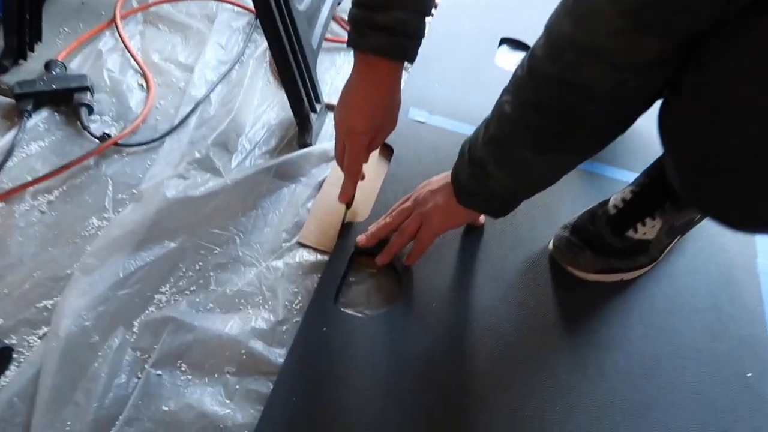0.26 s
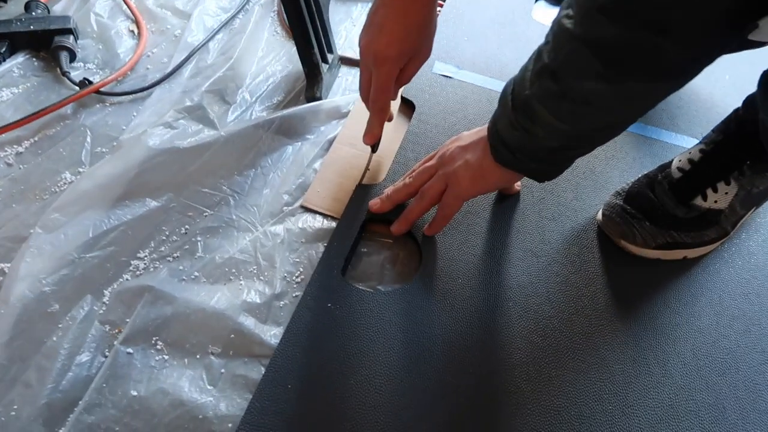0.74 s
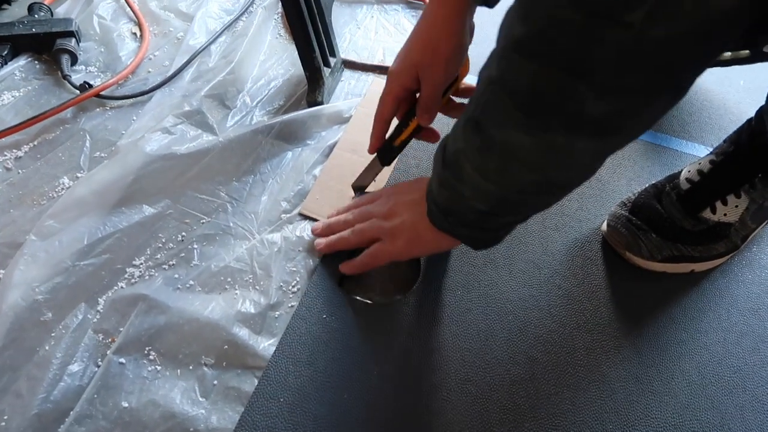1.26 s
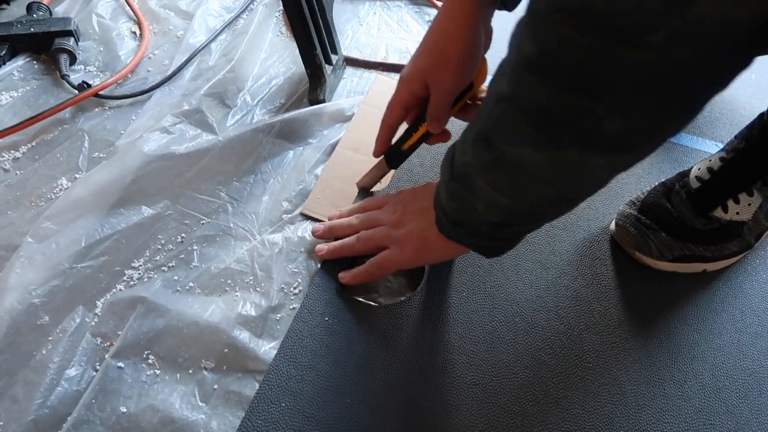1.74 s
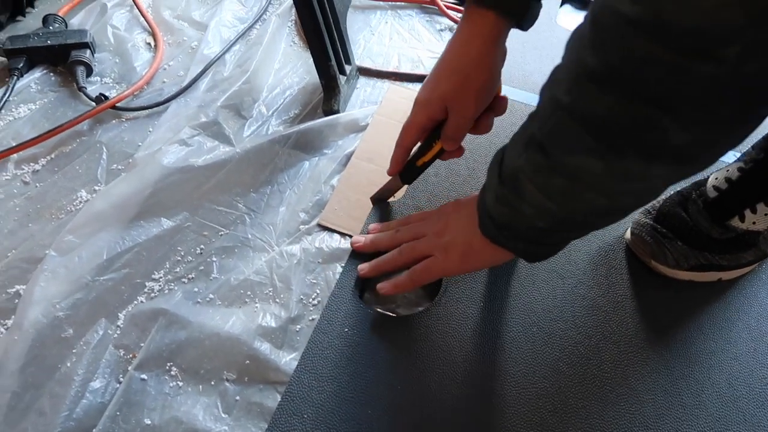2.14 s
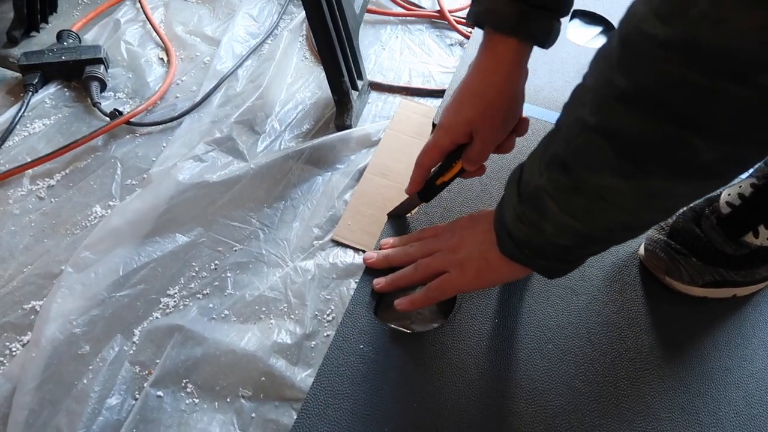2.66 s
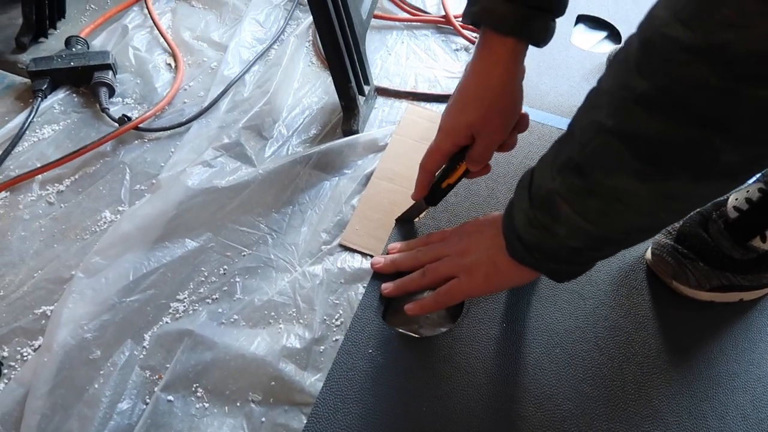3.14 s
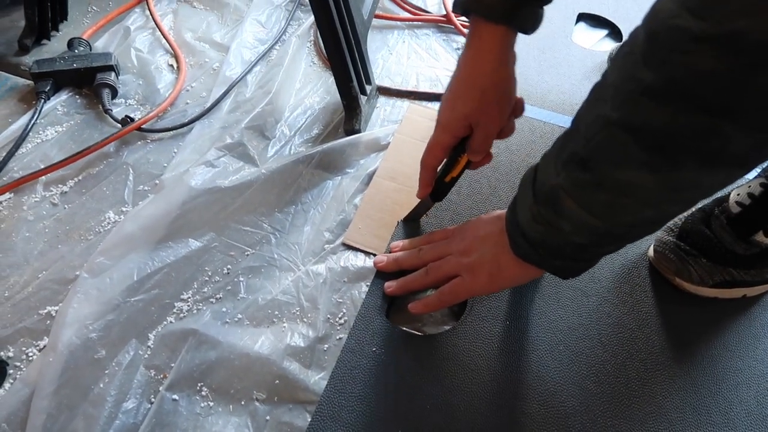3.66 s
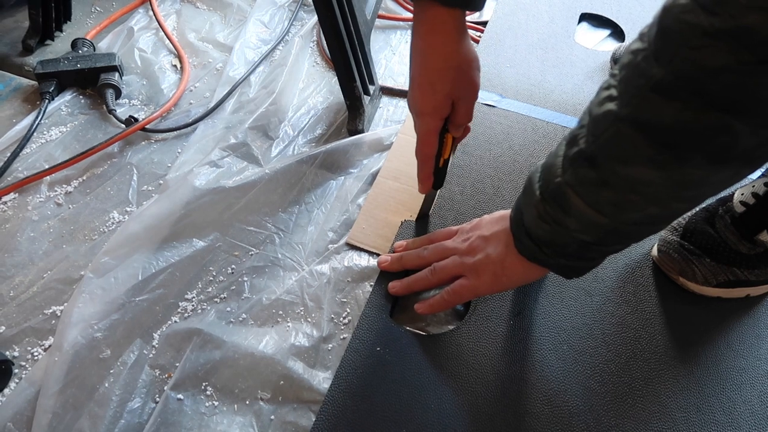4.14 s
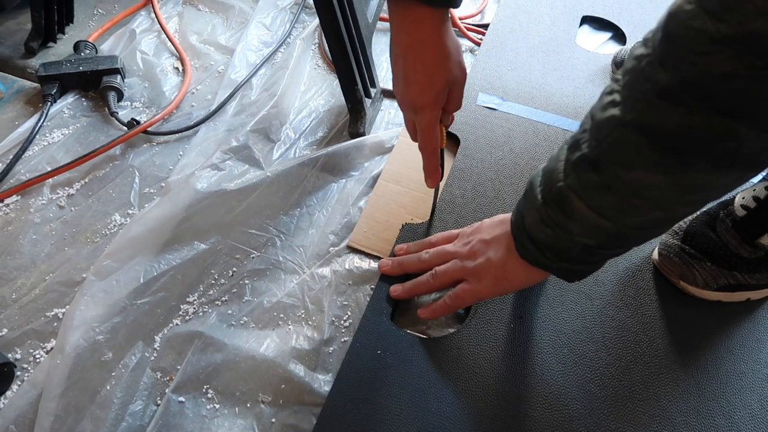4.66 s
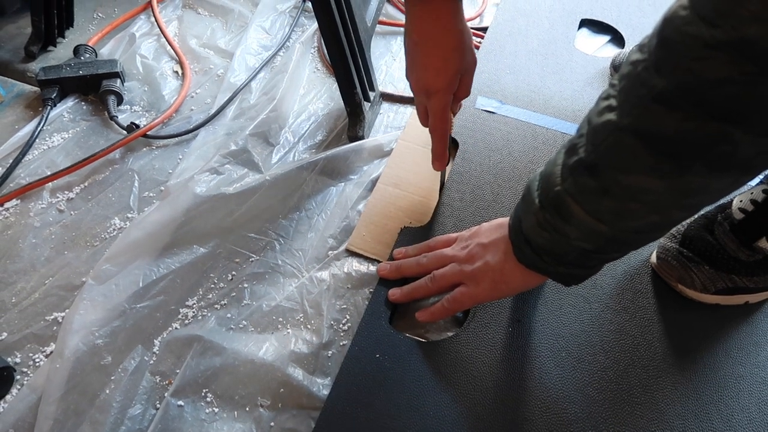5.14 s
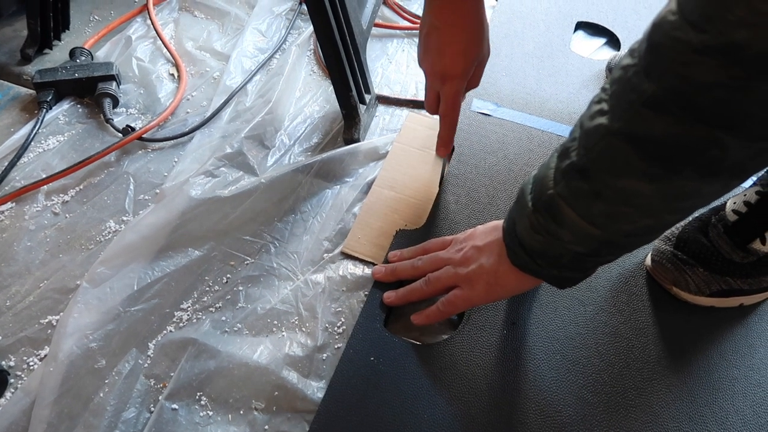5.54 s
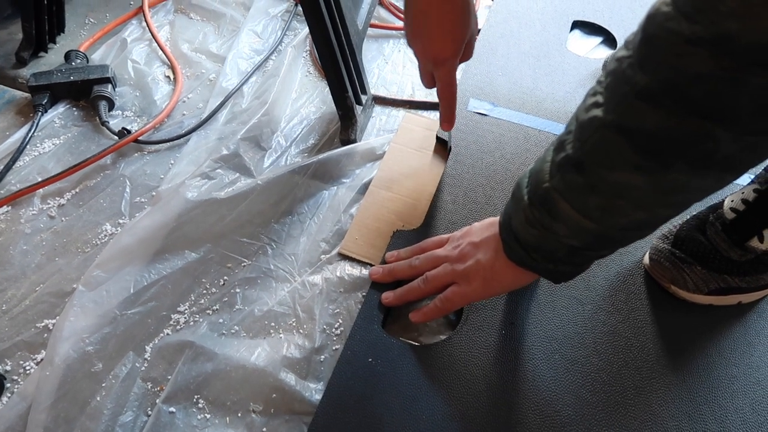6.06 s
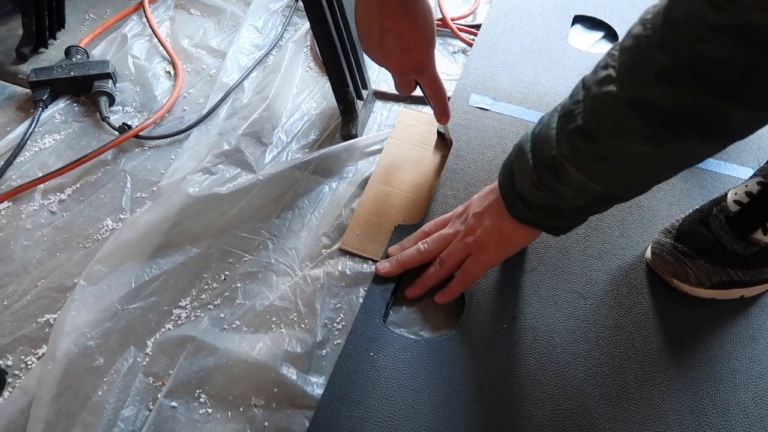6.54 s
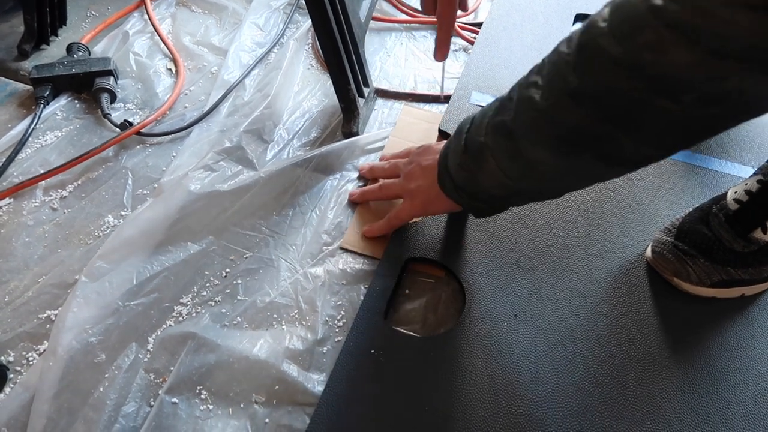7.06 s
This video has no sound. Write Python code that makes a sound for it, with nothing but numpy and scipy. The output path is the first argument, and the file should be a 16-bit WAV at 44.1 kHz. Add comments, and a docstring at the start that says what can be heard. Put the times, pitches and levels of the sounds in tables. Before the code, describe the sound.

Inside a bare metal van, heard close, with a faint steady low rumble from outside. A soft shoe scuff opens, then from 0.2 to 0.9 seconds short dry knife scratches and tiny ticks, with a sleeve swishing at about 0.7. A dull knock comes at 1.2, then light scrapes and a sharp tick at 1.4, sparse clicks around 1.7 and 2.0, and another knock at 2.1. It stays quiet with faint scratching and cloth swish until 3.6. A very loud bright snap strikes at 4.0 and rings briefly; more cracks with floor thuds come at 4.5 and 4.7, followed by scratches. A violent short rip bursts at 5.2, then an even, coarse rasping cut runs from 5.6 to 5.9. A soft slide over the floor follows around 6.0 to 6.3, small clicks at 6.4 to 6.6, a crisp tick and sleeve swish near 6.85, and last light ticks at 7.0.

```python
"""A utility knife trims a piece of cardboard on the floor of an empty van.
The blade scratches in short strokes, snaps through the flutes and makes one long rasping cut: noise made of
many tiny breaks, and bursts that ring the cardboard and the steel. Blows set the floor panel shuddering.
A jacket sleeve rustles and swishes as bands of noise, and the metal cargo space rings briefly
over a low outdoor rumble."""
import sys
import numpy as np
from scipy import signal
from scipy.fft import rfft, irfft, next_fast_len
from scipy.io import wavfile

SR = 44100
rng = np.random.default_rng(int(sys.argv[2]) if len(sys.argv) > 2 else 0)


def store_wav(level_fs):
    """Save 16-bit WAV to argv[1]."""
    pcm = np.round(np.clip(np.atleast_2d(level_fs), -1, 1) * 32767)
    wavfile.write(sys.argv[1], SR, pcm.T.astype(np.int16))


N = 321753

# short strokes through the cardboard:
# (start [s], end [s], level before the trim [dB], tilt above 300 Hz [dB per octave])
STROKES = [(0.23, 0.312, -42.5, 3.5), (0.444, 0.526, -39, 2.5), (0.477, 0.498, -42.5, 2),
           (.55, 0.672, -47, 1), (0.772, 0.799, -37, 2), (0.813, 0.852, -37.5, 2.5),
           (1.261, 1.385, -49, 6.5), (1.415, 1.445, -41.5, -1), (1.431, 1.436, -34, 1.5),
           (1.48, 1.498, -41, -0.5), (1.739, 1.809, -45, -1.5), (2.004, 2.037, -42.5, -3),
           (2.681, 2.777, -48.5, 3), (2.95, 2.955, -53.5, 4), (3.068, 3.107, -45, 1),
           (3.434, 3.474, -47, 3), (3.597, 3.667, -42.5, 0), (3.758, 3.811, -45.5, .5),
           (4.046, 4.103, -49, 3), (4.119, 4.128, -39.5, 2.5), (4.68, 4.708, -32.5, 1),
           (4.71, 4.784, -40.5, 2.5), (4.839, 4.899, -43, 1.03), (4.905, 4.969, -40, 1.83),
           (5.135, 5.143, -38.5, 2.5), (5.999, 6.044, -48, -2.5), (6.159, 6.169, -46.5, 2),
           (6.415, 6.457, -39.5, -1.45), (6.434, 6.448, -38, 0), (6.846, 6.852, -35, 1.5),
           (6.851, 6.857, -37, 6), (6.861, 6.899, -48, -0.5), (7.04, 7.069, -41, 2)]
# resonances under the scraping, also used by tears(): (frequency [Hz], width [Hz], lift or dip [dB])
RASP_PEAKS = [(255.2, 110, 0.5), (699, 150, 6.5), (1301, 180, 7), (1865, 310, 5), (2361, 330, 5.5),
              (3540, 730, 3.5), (7400, 530, -0.5)]


def strokes(edge_s=0.0019, lift_s=0.0069, trim_db=-0.62, graze_s=0.04, graze_db=-9):
    """In a short stroke the tip grazes the surface, bites into it, and grazes again as it lifts."""
    out = np.zeros((2, N))
    for start, end, db, tilt in STROKES:
        t = np.arange(start - graze_s, end + graze_s, 1 / SR)
        bite = np.interp(t, [start - edge_s, start + edge_s, end, end + lift_s], [0, 1, 1, 0])
        graze = np.interp(t, [t[0], start, end, t[-1]], [0, 1, 1, 0]) * amp(graze_db)
        scrape = rasp(t, tilt, RASP_PEAKS, slip_db=0.87, grit_db=5.0)
        add(out, t[0], amp(db + trim_db) * np.maximum(bite, graze) * scrape)
    return out


# force on the blade as it strains and bursts through: (time [s], level before the trim [dB])
RIP_FORCE = [(5.135, -43.5), (5.183, -34), (5.19, -22), (5.2, -20.5), (5.222, -22.5), (5.23, -32),
             (5.245, -36.5)]
# resonances of the sheet in the rip: (frequency [Hz], width [Hz], lift or dip [dB])
RIP_PEAKS = [(258, 116, 3.5), (450, 144, -4), (709, 77, 11), (1195, 74, 5), (1475, 128, 10),
             (1696, 75, 8.5), (1970, 86, 7), (2458, 102, 10), (3150, 68, 1), (3360, 118, 4.5),
             (4650, 135, 6.5), (5160, 83, 9), (6270, 70, 8), (7460, 164, 5.5)]


def rip():
    """The blade strains, then bursts through several flutes at once."""
    return pull(RIP_FORCE, RIP_PEAKS, trim_db=-0.01, tilt_db=1.46, slip_db=-0.14, grit_db=3.5)


# force on the blade through the one long, deep cut: (time [s], level before the trim [dB])
CUT_FORCE = [(5.43, -60), (5.55, -45), (5.641, -38.5), (5.648, -31), (5.69, -31.5), (5.735, -33),
             (5.775, -30.5), (5.83, -31), (5.88, -30), (5.896, -38), (5.92, -55)]
# resonances of the sheet in the deep cut: (frequency [Hz], width [Hz], lift or dip [dB])
CUT_PEAKS = [(255, 98, 1.5), (682, 143, 7.5), (1338, 102, 11.5), (1873, 195, 13), (2360, 364, 7),
             (2815, 176, 3), (3484, 160, 6.5), (4290, 250, 3.5), (4880, 250, 5), (5850, 230, -1),
             (7260, 630, 5)]


def long_cut():
    """The deep cut: a dense, even rasp through the narrow resonances of the pinned sheet."""
    return pull(CUT_FORCE, CUT_PEAKS, trim_db=-0.8, tilt_db=0.1, slip_db=1.6, grit_db=2.5)


def pull(curve, peaks, trim_db, tilt_db, slip_db, grit_db):
    """One sustained scrape, as loud as the force behind it."""
    out = np.zeros((2, N))
    times, force_db = np.transpose(curve)
    t = np.arange(times[0], times[-1], 1 / SR)
    level = amp(np.interp(t, times, force_db) + trim_db)
    add(out, t[0], level * rasp(t, tilt_db, peaks, slip_db, grit_db))
    return out


# basic spectrum of all scraping, a shape only: (frequency [Hz], relative level [dB])
RASP_SPECTRUM = [(60, -19.5), (180, 4.5), (450, -0.5), (1000, -3.5), (1800, -4.5), (3000, -3.5),
                 (5000, -9.5), (8500, -15), (13000, -18), (14500, -31.5), (16000, -45)]


def rasp(t, tilt_db, peaks, slip_db, grit_db, slips_per_s=300, places_per_s=25, echo=0.0843, echo_s=.0045):
    """The edge catches and slips as it is drawn along, so the fibres break in clumps."""
    size = len(t)
    force = fibres(size, per_s=4500, spread_db=grit_db, hiss=0.473)
    force = force * amp(slip_db * wander(size, slips_per_s))
    # each break echoes through the surface, differently at each place along the way
    fade = echo * np.exp(-((t - t[0]) / echo_s) ** 2)
    echoes = np.zeros((2, size))
    for share in wandering_shares(size, places_per_s):
        pattern = fade * rng.standard_normal((2, size))
        echoes += signal.fftconvolve(force * share, pattern, axes=1)[:, :size]
    return unit(colour(force + echoes, RASP_SPECTRUM, peaks, tilt_db))


# snaps and ticks of the blade, also used by tears():
# (time [s], cardboard level [dB], blade level before the trim [dB], blade ring [Hz], strength of that ring [dB],
#  pitch of the sheet [ratio], length of the break [s])
SNAPS = [(.443, -51.5, -42, 3000, 4.5, 0.91, 0.0042), (.578, -59, -47.5, 3900, 6, 1, .005),
         (.611, -39, -49.5, 3910, 2.5, 1.107, 0.0056), (0.653, -45.5, -54, 4400, 14, 1.13, .005),
         (.85, -43.5, -39.5, 4360, 9.5, 0.97, 0.0053), (1.159, -39.5, -66, 3500, -3, .95, 0.0049),
         (1.298, -41.5, -46.5, 9700, 1.5, 1.22, 0.0039), (1.4116, -43.5, -30, 4400, 17, 0.67, .0045),
         (1.436, -38.5, -43.5, 3400, -2, 1.04, .007), (1.493, -51, -44.5, 4090, 5, 1.08, .005),
         (1.656, -39.5, -47.5, 3800, 12.5, 0.926, 0.0053), (1.667, -39.5, -38.5, 6850, 2.5, 1.09, 0.00575),
         (1.863, -45, -44, 4025, -2, 0.984, 0.0071), (2.003, -46, -56.5, 4000, -5.5, 0.88, 0.0047),
         (2.026, -52.5, -48, 6500, 2.5, 1.05, 0.0049), (2.068, -45, -47, 4450, 3.5, 1, 0.0048),
         (2.123, -40, -54.5, 4200, -8.5, 1.03, 0.0068), (2.171, -54.5, -41, 5200, -4, 1.3, 0.0059),
         (2.833, -71, -47.5, 11590, 6.5, 1, .002), (3.598, -58.5, -45, 4600, -15.5, 1, .005),
         (3.65, -36.5, -38, 4550, -13.5, 1.11, 0.0082), (3.774, -45, -46.5, 3810, -4.5, 1.13, .005),
         (4.0324, -14.5, -12.5, 7390, 1.5, 0.964, .0038), (4.098, -37, -38, 4240, 1, 1.1, 0.0047),
         (4.459, -28.5, -41, 2000, -2, 0.954, 0.00466), (4.4744, -33.5, -34, 3540, -17.5, 0.89, 0.0072),
         (4.6635, -16.5, -21.5, 7630, -5.5, 1.005, 0.00526), (4.699, -35, -35, 3520, -8.5, 0.86, 0.0068),
         (4.94, -41, -40, 4800, -1, 0.795, 0.0063), (5.013, -43, -54, 4200, -4, 0.79, .005),
         (5.199, -24.5, -29, 3910, -3.5, 1.012, 0.0044), (5.21, -30, -34, 5110, 2.5, 1.11, 0.0046),
         (5.2195, -24.5, -33.5, 3370, 4, 1.002, 0.0053), (5.648, -32.5, -43, 3500, -7.5, 1.23, 0.0064),
         (5.686, -35.5, -41, 4900, -3, .96, .005), (5.77, -35, -42, 3500, -3, .96, .005),
         (5.794, -35, -43, 4250, -3, .96, .004), (5.822, -33, -38, 3500, -7.5, 1.15, .006),
         (5.867, -37, -33, 3650, 7.5, 1.04, 0.0046), (5.995, -44.5, -48, 3800, 3, 0.994, 0.0064),
         (6.277, -42, -49.5, 3850, -1, 1.004, 0.0052), (6.415, -43, -52, 3800, -4.5, 0.98, 0.0057),
         (6.443, -34.5, -48.5, 4000, -6.5, 1.05, 0.0037), (6.527, -38.5, -49.5, 3750, -4.5, 1.12, 0.0056),
         (6.623, -44, -49.5, 6470, -4, 0.933, 0.0051), (6.788, -54, -47, 3580, 0, 1.07, 0.0048),
         (6.847, -33.5, -47, 3200, -0.5, .95, 0.0033), (6.849, -45, -26.5, 8600, -2, 1.06, 0.00605),
         (7.033, -43.5, -51, 3600, 9.5, 1.18, .004), (7.049, -34.5, -45, 3470, 10.5, 0.946, 0.00456)]
# modes of the cardboard on its backing, at pitch ratio 1: (frequency [Hz], level [dB], t60 [s])
BOARD_MODES = [(690, -16.5, .02), (974, -10, 0.024), (1430, 1, 0.0147), (1760.3, -0.5, 0.017),
               (1970.5, 2.5, 0.0155), (2422, 2.5, 0.0093), (2862, -3.5, 0.0071), (3319, 4.5, 0.0121)]
# modes of the blade and its holder: (frequency [Hz], level [dB], t60 [s])
BLADE_MODES = [(4000, -5, 0.0036), (4793, -3, 0.00303), (5960, -5.5, 0.0038), (7240, -2, 0.0044),
               (10060, -1.5, 0.0033), (12800, -9, 0.0056)]


def snaps(crack=3.7, pop=4, blade_trim_db=3.0, ring_t60=0.00503):
    """A flute gives way: the sheet, stiffer or slacker by place, pops; the blade's free length sets its ring."""
    out = np.zeros((2, N))
    t = np.arange(SR // 12) / SR
    for s, board_db, blade_db, hz, ring_db, stretch, break_s in SNAPS:
        force = fracture(t, decay_s=break_s, crumble=0.242)
        dead_pop = ring([(1714, 0.00512, 0.00041)], t)
        board = ring(BOARD_MODES, t * stretch) + pop * dead_pop
        steel = ring(BLADE_MODES + [(hz, ring_db, ring_t60)], t)
        steel[:2] += crack * np.array([1, -1])  # the bright edge of the break
        for body, db in (board, board_db), (steel, blade_db + blade_trim_db):
            sound = unit(signal.fftconvolve(force, body[None])[:, :len(t)])
            # a quarter turn of phase in the side signal sets left and right slightly apart
            quarter_turn = signal.hilbert(sound[0]).imag
            side = 0.575 * quarter_turn + 0.505 * sound[1]
            add(out, s, blow(stereo([sound[0], side], side_db=-4), db))
    return tone_filter(out)


def fracture(t, decay_s, crumble):
    """One clean break, followed within milliseconds by tearing fibres and echoes off the floor."""
    force = crumble * rng.standard_normal((2, len(t))) * np.exp(-(t / decay_s) ** 1.49)
    force[:, 0] += 1
    return force


def tears(tilt_db=-0.5, rise_s=0.0017, tear_db=-44.5, snap_ref_db=-28, follow=0.51, fade_db_per_s=167.5):
    """Each snap frees the blade, which tears on through the fibres a little and comes to rest."""
    out = np.zeros((2, N))
    t = np.arange(SR // 6) / SR
    for s, board_db, *_ in SNAPS:
        # a louder snap gives a louder tear, by a share of its extra decibels
        db = tear_db + follow * (board_db - snap_ref_db) - fade_db_per_s * t
        scrape = rasp(t, tilt_db, RASP_PEAKS, slip_db=1.5, grit_db=7.0)
        add(out, s, amp(db) * (1 - np.exp(-t / rise_s)) * scrape)
    return out


# blows that reach the floor panel: (time [s], level [dB], pitch of the struck spot [Hz], its t60 [s])
KNOCKS = [(1.159, -25.5, 475.5, 0.029), (1.164, -30, 189.3, 0.059), (2.1155, -24.5, 434, 0.063),
          (2.124, -32, 303, 0.083), (3.651, -30.5, 646, 0.041), (4.036, -30.5, 254, 0.07),
          (4.033, -32, 499, 0.01987), (4.461, -28, 317, 0.0253), (4.474, -29.5, 337.7, 0.06),
          (4.667, -20.5, 270.2, 0.0466), (4.665, -24, 538.4, 0.026), (5.2, -28, 700.6, 0.054),
          (5.886, -31, 321, 0.0345), (6.426, -34.5, 214.6, 0.06), (6.528, -30.5, 345, 0.024),
          (6.877, -39, 379, 0.041)]
# modes of the floor panel, before each blow shifts them a little: (frequency [Hz], level [dB], t60 [s])
PANEL_MODES = [(215, -1.5, 0.1), (277.1, 4, 0.073), (389.3, -2.5, 0.053), (533.5, 5.5, 0.025),
               (636, 1.5, 0.0347)]


def knocks(octaves=0.768, rise_s=0.00078, panel_db=-10):
    """Each blow rings the struck spot and stirs the panel modes near that pitch."""
    out = np.zeros((2, N))
    t = np.arange(SR // 5) / SR
    for s, db, spot_hz, spot_t60 in KNOCKS:
        sound = ring([(spot_hz, 0, spot_t60)], t)
        for hz, level, t60 in PANEL_MODES:
            near_db = -4 * (np.log2(hz / spot_hz) / octaves) ** 2
            late = np.maximum(t - rng.uniform(0, 0.003056), 0)  # each mode takes a moment to answer
            shifted_hz = hz * rng.uniform(0.9106, 1.0727)
            sound = sound + ring([(shifted_hz, level + near_db + panel_db, t60)], late)
        add(out, s, blow(sound * (1 - np.exp(-t / rise_s)), db)[None])
    return tone_filter(out)


# tone of snaps and knocks, with little bass and a treble roll-off above 13 kHz: (frequency [Hz], gain [dB])
CLICK_TONE = [(40, -29.5), (110, -19), (190, 0), (13300, -1), (14500, -15), (16000, -22)]
# small tone adjustments for snaps and knocks: (frequency [Hz], width [Hz], lift or dip [dB])
TONE_BANDS = [(782, 159, 1), (150, 46, -1)]


def tone_filter(x):
    """Tone filter for snaps and knocks: little bass, and treble rolled off above 13 kHz."""
    return colour(x, CLICK_TONE, TONE_BANDS)


# shudders after the heavier blows: (time of the blow [s], level [dB], pitch [Hz])
SHUDDERS = [(1.16, -51, 380), (2.116, -48.5, 310.9), (4.034, -42, 295), (4.461, -42, 318.3),
            (4.665, -39, 325.6), (5.199, -45, 279.5)]


def shudders(peak_s=0.0692, width_hz=110.8):
    """The close low modes of the panel build up after a blow and die away, as a narrow band of noise."""
    out = np.zeros((2, N))
    t = np.arange(SR // 2) / SR
    swell = (t / peak_s * np.exp(1 - t / peak_s)) ** 2
    for s, db, hz in SHUDDERS:
        add(out, s, amp(db) * swell * band(t, hz, width_hz))
    return stereo(out)


# bands of knife and floor that sing after the hardest snap: (frequency [Hz], width [Hz], level [dB], t60 [s])
AFTERRING = [(920.5, 120, -34.5, 0.46), (1737, 185, -43, .42), (3367, 220, -46.5, 0.37),
             (7280, 570, -44.5, .42)]


def afterring(hard_snap_s=4.034):
    """Clusters of close modes ring on after the hardest snap, as fading bands of noise."""
    out = np.zeros((2, N))
    t = np.arange(SR // 2) / SR
    for hz, width_hz, db, t60 in AFTERRING:
        add(out, hard_snap_s, amp(db - 60 * t / t60) * band(t, hz, width_hz))
    return stereo(out)


# force of the slide: (time [s], level before the trim [dB])
SLIDE_FORCE = [(5.93, -66.5), (6.01, -42), (6.07, -53.5), (6.14, -45.5), (6.165, -42), (6.24, -39.5),
               (6.28, -52.5), (6.31, -66.5)]
# resonances of the rubbed floor: (frequency [Hz], width [Hz], lift [dB])
SLIDE_PEAKS = [(360.3, 180, 10), (680, 200, 8), (1340, 105, 2.2), (1850, 146, 2.4), (3777, 260, 8)]


def floor_slide():
    """A hand or shoe slides over the floor after the deep cut."""
    return pull(SLIDE_FORCE, SLIDE_PEAKS, trim_db=-1.0, tilt_db=-0.52, slip_db=-0.5, grit_db=2.0)


# a shoe scuffs the floor as the weight shifts: (time [s], level [dB])
SCUFF = [(0, -40.5), (.04, -43.5), (.09, -43.5), (.15, -53.5)]
# spectrum of the scuff, a shape only: (frequency [Hz], relative level [dB])
SCUFF_SPECTRUM = [(80, -18.5), (200, -1), (330, 2), (480, 2.5), (750, -6.5), (1200, -8.5), (2000, -21.5),
                  (4000, -40), (9000, -58.5)]


def scuff():
    """A sole rubs dully over the floor and comes to rest."""
    out = np.zeros((2, N))
    times, db = np.transpose(SCUFF)
    t = np.arange(times[0], times[-1], 1 / SR)
    grip = fibres(len(t), per_s=2500, spread_db=1.0, hiss=1.0)
    add(out, t[0], amp(np.interp(t, times, db)) * unit(colour(grip, SCUFF_SPECTRUM)))
    return stereo(out)


# hand, knee and shoe dragging on the floor panel: (start [s], end [s], level [dB])
DRAGS = [(.15, 0.954, -52), (1.249, 1.327, -45.5), (2.001, 2.011, -32.5), (4.68, 4.75, -39),
         (4.761, 4.826, -44), (5.653, 5.899, -57), (5.949, 6.29, -48.5), (6.419, 6.455, -43)]
# spectrum of the dragging, a shape only: (frequency [Hz], relative level [dB])
DRAG_SPECTRUM = [(70, -18.5), (130, -13.5), (200, 3), (330, -2), (480, -1), (750, -3.5), (1200, -19.5),
                 (3000, -35.5), (8000, -62.5)]


def drags(edge_s=.012, judder_db=2):
    """The floor panel murmurs when soft things judder over it."""
    out = np.zeros((2, N))
    for start, end, db in DRAGS:
        t, pressure = contact(start, end, edge_s)
        force = fibres(len(t), per_s=1500, spread_db=1.5, hiss=0.904)
        force = force * amp(judder_db * wander(len(t), 60.2))
        add(out, t[0], amp(db) * pressure * unit(colour(force, DRAG_SPECTRUM)))
    return stereo(out)


def contact(start, end, edge_s, release_s=0.0076):
    """Times and pressure of one sliding contact: it bites quickly and dies away."""
    t = np.arange(start - edge_s, end + 5 * release_s, 1 / SR)
    bite = np.clip((t - t[0]) / (2 * edge_s), 0, 1)
    return t, bite * np.exp(-np.maximum(t - end + edge_s, 0) / release_s)


# arm movements, each one smooth swell of rustle: (middle [s], length [s], level before trim and colour [dB])
ARM_MOVES = [(0.115, 1, -58), (0.604, 0.314, -53), (1.14, 0.462, -55), (2.182, 0.48, -56),
             (3.265, 0.547, -58), (4.063, 0.224, -48.5), (4.761, 0.298, -52), (5.254, 0.24, -54),
             (5.755, 0.89, -54), (6.308, 0.963, -54.5), (7, 0.52, -53)]
# colour of the cloth: (frequency [Hz], gain [dB])
CLOTH_SPECTRUM = [(100, -12), (300, 10), (900, 13.5), (1800, 10), (3000, 6.5), (5000, 3), (8000, -5),
                  (13000, -7.5), (14500, -22), (16000, -35)]


def sleeve(rest_db=-65.5, trim_db=-1, flutter_db=2.5, weave_hz=2350, weave_width_hz=1600, weave_db=4):
    """Cloth rubs softly, swelling and fading with each movement of the arms."""
    t = np.arange(N) / SR
    power = amp(rest_db) ** 2  # the cloth is never quite still
    for middle, length, db in ARM_MOVES:
        power = power + amp(db) ** 2 * np.exp(-2 * (2 * (t - middle) / length) ** 2)
    level = np.sqrt(power) * amp(trim_db + flutter_db * wander(N, 35))
    friction = unit(fibres(N, per_s=1200, spread_db=0.5, hiss=1.69))
    cloth = colour(friction, CLOTH_SPECTRUM, [(weave_hz, weave_width_hz, weave_db)])
    return stereo(cloth * level)


# slides of cloth on cloth: (width of the band [Hz], list of (time [s], pitch [Hz], level before the trim [dB]))
SWISHES = [(380, [(.56, 2461, -56), (.66, 2140, -41), (.75, 1938, -45), (.82, 1880, -45), (.92, 1750, -46),
           (1.03, 1680, -50.5), (1.14, 1593, -50), (1.22, 1547, -66.5)]), (420, [(1.4, 1510, -63.5),
           (1.58, 1449, -53), (1.8, 1330, -64)]), (1110, [(2.9, 1292, -64.5), (3.08, 1601, -50),
           (3.22, 2003, -52.5), (3.36, 1895, -53.5), (3.55, 1594, -62.5)]), (603, [(6.8, 2192, -54.5),
           (6.9, 2038, -44), (7.05, 1690, -60), (7.28, 1391, -50)])]


def swishes(trim_db=-2):
    """Weave sliding over weave: a band of hiss whose pitch follows the speed."""
    out = np.zeros((2, N))
    for width_hz, slide in SWISHES:
        times, hz, db = np.transpose(slide)
        t = np.arange(times[0], times[-1], 1 / SR)
        hiss = band(t, np.interp(t, times, hz), width_hz)
        add(out, t[0], hiss * amp(np.interp(t, times, db) + trim_db))
    return stereo(out)


def van(x, changes_per_s=60):
    """The pattern of echoes keeps changing as hands and blade move."""
    echo = np.zeros((2, N))
    for share in wandering_shares(N, changes_per_s):
        echo += signal.fftconvolve((x.mean(0) * share)[None], van_tail(), axes=1)[:, :N]
    return echo


# how long the cargo space rings: (frequency [Hz], t60 [s])
VAN_T60 = [(200, 0.03), (500, 0.67), (720, 1.04), (1400, 0.6021), (3700, 0.6145), (7400, 0.4),
           (12000, 0.16)]
# how strongly it rings: (frequency [Hz], level [dB])
VAN_DB = [(100, -20.5), (290, -4), (520, -6.5), (720, -13.5), (980, -8.5), (1700, -8.5), (2600, -11.5),
          (4000, -11.5), (7400, -14), (12000, -12.5)]


def van_tail(build_s=0.0029):
    """Dense echoes from close metal walls, each band dying at its own speed."""
    hz, t, z = signal.stft(rng.standard_normal((2, SR)), SR, nperseg=256)
    t60 = read(VAN_T60, hz)[:, None]
    even_energy = np.sqrt(2 * np.log(1000) / (t60 * SR))  # a long ring gets no extra energy
    z = z * amp(read(VAN_DB, hz)[:, None] - 60 * t / t60) * even_energy
    tail = signal.istft(z, SR, nperseg=256)[1]
    build_up = 1 - np.exp(-np.arange(tail.shape[1]) / SR / build_s)
    return stereo(tail * build_up)


# spectrum of the outdoor rumble, a shape only: (frequency [Hz], relative level [dB])
RUMBLE_SPECTRUM = [(20, -16.5), (45, -4.5), (72, -1), (125, -0.5), (155, -8), (220, -6.5), (330, -11),
                   (500, -14), (850, -17), (1500, -24.5), (2500, -30.5), (5000, -35), (13000, -44),
                   (14500, -63.5), (16000, -70)]


def rumble(level_db=-46, swell_db=-0.1331):
    """Steady low noise from outside, heard through the body of the van."""
    noise = unit(colour(rng.standard_normal((2, N)), RUMBLE_SPECTRUM))
    return stereo(noise * amp(level_db + swell_db * wander(N, 6)))


def fibres(size, per_s, spread_db, hiss):
    """Separate fibres break, most small and a few large, over smooth friction."""
    happens = rng.random(size) < per_s / SR
    breaks = happens * amp(spread_db * np.minimum(rng.exponential(1, size), 3.5))
    return unit(breaks * rng.standard_normal((2, size))) + hiss * rng.standard_normal((2, size))


def ring(modes, t):
    """Sum of dying sine waves: what a body sounds like after one sharp tap."""
    return sum(amp(db - 60 * t / t60) * np.sin(2 * np.pi * hz * t) for hz, db, t60 in modes)


def band(t, hz, width_hz):
    """Mid and side noise in a narrow band, whose centre may move."""
    lowpass = signal.butter(2, width_hz / 2, fs=SR, output="sos")
    slow = signal.sosfilt(lowpass, rng.standard_normal((2, 2, len(t))))
    turn = 2 * np.pi * np.cumsum(hz * np.ones(len(t))) / SR
    return unit(slow[0] * np.cos(turn) + slow[1] * np.sin(turn))


def wander(size, per_s):
    """Random values joined by straight lines, of rms 1."""
    at = np.arange(size) * per_s / SR
    return unit(np.interp(at, np.arange(2048), rng.standard_normal(2048)))


def wandering_shares(size, per_s, count=4):
    """Drifting weights that blend several echo patterns; their squares always add up to 1."""
    shares = np.array([wander(size, per_s) for _ in range(count)])
    return shares / np.linalg.norm(shares, axis=0)


def amp(db):
    """Turns decibels into a factor."""
    return 10 ** (np.asarray(db) / 20)


def unit(x):
    """Scales to rms 1."""
    return x / np.sqrt(np.mean(x ** 2) + 1e-20)


def blow(x, db):
    """Sets the rms level of the first hundredth of a second."""
    start_power = np.mean(x[..., :SR // 100] ** 2, -1, keepdims=True)
    return amp(db) * x / np.sqrt(start_power)


def read(points, hz):
    """Joins the points of a table on a log-frequency axis."""
    f, value = np.transpose(points)
    return np.interp(np.log(hz + 1), np.log(f), value)


def colour(x, points, peaks=(), tilt_db=0):
    """Filters by a spectrum, a tilt around 2 kHz and some resonances."""
    size = next_fast_len(x.shape[-1] + 2048)
    hz = np.fft.rfftfreq(size, 1 / SR)
    db = read(points, hz) + tilt_db * np.log2(np.maximum(hz, 300) / 2000)
    for centre, width, lift in peaks:
        db = db + lift / (1 + (2 * (hz - centre) / width) ** 2)
    return irfft(rfft(x, size) * amp(db), size)[..., :x.shape[-1]]


def add(mix, s, sound):
    """Mixes a sound in at a time."""
    part = mix[:, max(round(s * SR), 0):][:, :sound.shape[-1]]
    part += sound[:, :part.shape[-1]]


# side against mid, narrow in the bass and wide in the treble: (frequency [Hz], gain of the side [dB])
WIDTH = [(60, -44), (200, -12.5), (700, -10), (1300, -9.5), (2400, -7.5), (4400, -1.5), (8000, 2.5),
         (14000, 5.5)]


def stereo(pair, side_db=0):
    """Makes left and right from a mid and a side signal; the two agree in the bass."""
    side = amp(side_db) * colour(pair[1], WIDTH)
    return np.array([pair[0] + side, pair[0] - side])


def scene():
    """Cutting and sliding sounds, their echo in the van and the background."""
    rasps = stereo(strokes() + rip() + long_cut() + floor_slide() + tears(), side_db=-5.0)
    clicks, thuds = snaps(), knocks()
    echo = van(amp(1.0) * rasps + amp(-0.73) * clicks + amp(-2.0) * thuds)
    work = rasps + clicks + thuds + echo
    after_and_under = shudders() + afterring() + scuff() + drags()
    return work + after_and_under + sleeve() + swishes() + rumble()


def record(dry, edge_hz=15900):
    """Clips any peak beyond full scale, then removes the treble above the band limit."""
    held = np.clip(dry, -1, 1)
    lowpass = signal.firwin(255, edge_hz, window=("kaiser", 9), fs=SR)
    return signal.oaconvolve(held, lowpass[None], "same")


dry = scene()
out = record(dry)
store_wav(out)
```